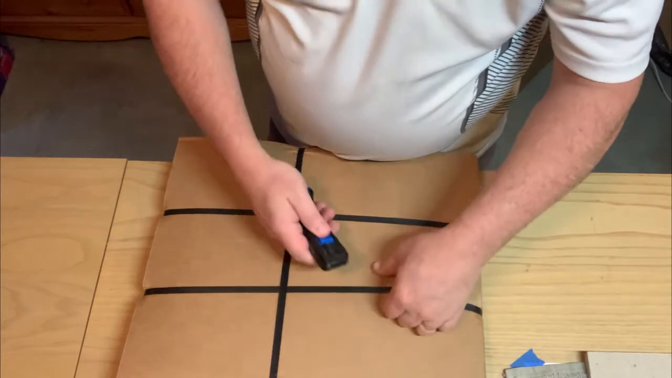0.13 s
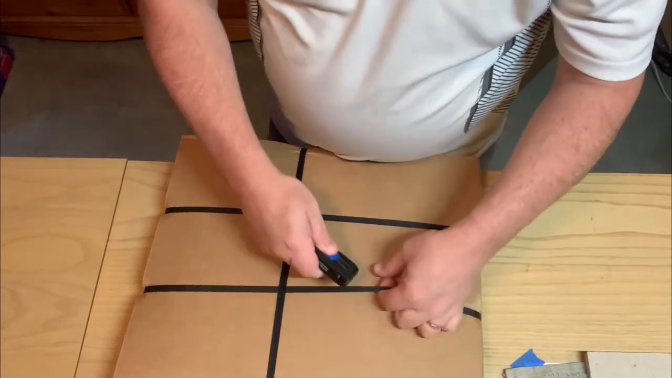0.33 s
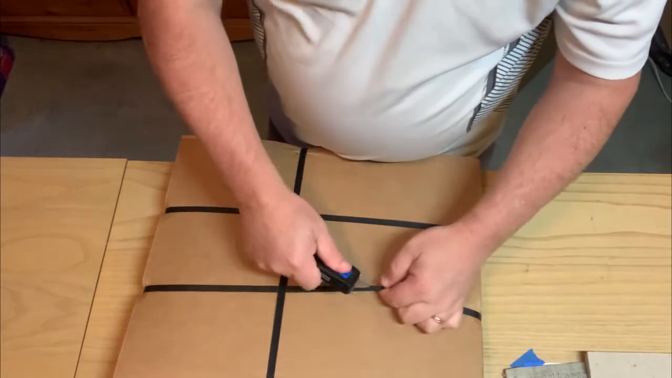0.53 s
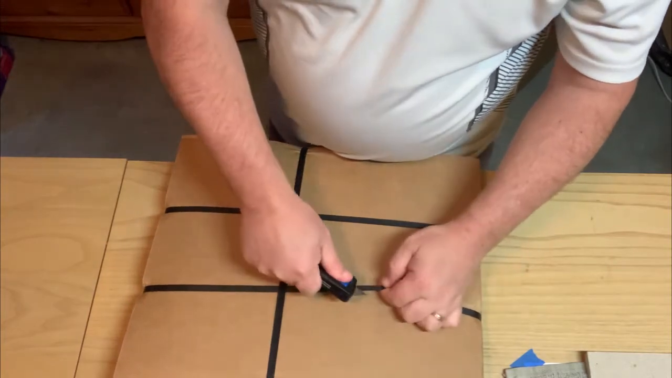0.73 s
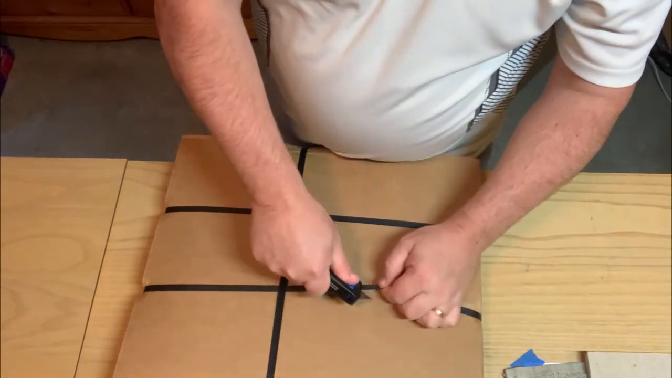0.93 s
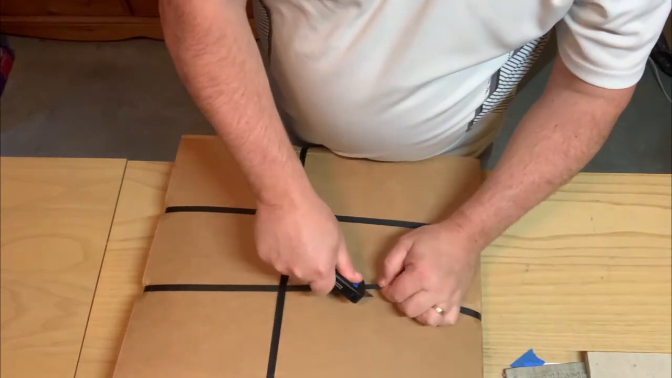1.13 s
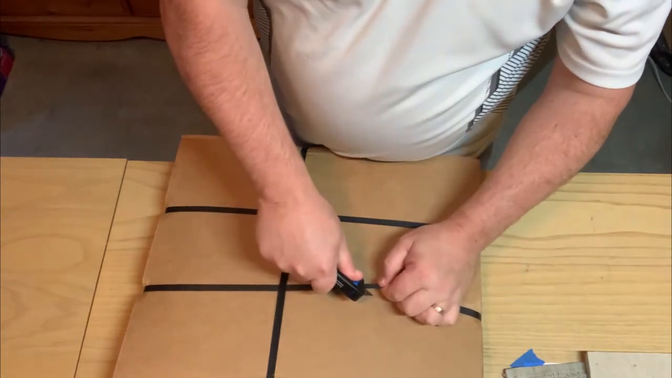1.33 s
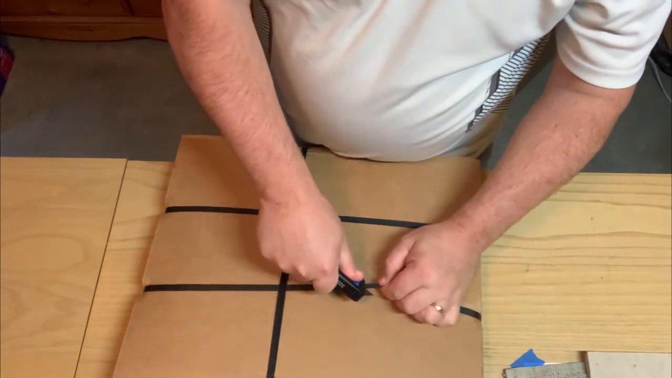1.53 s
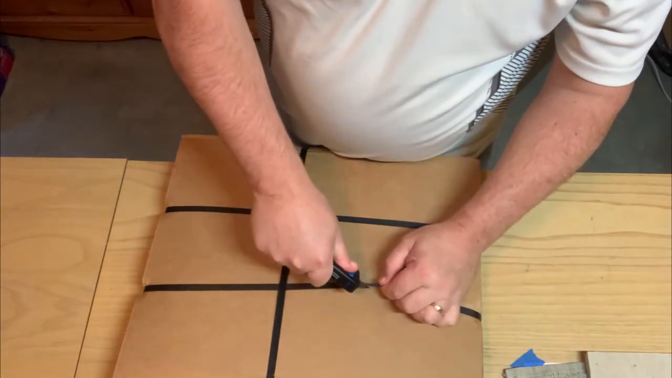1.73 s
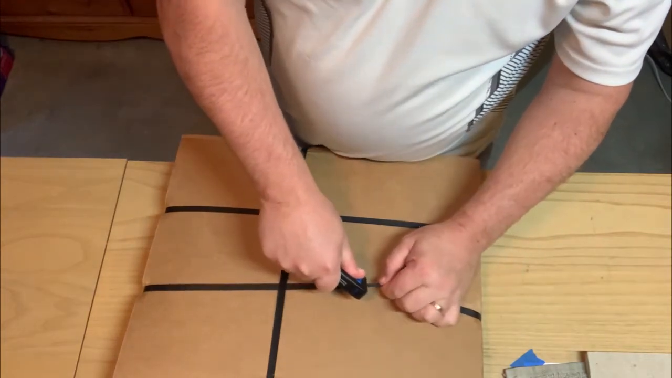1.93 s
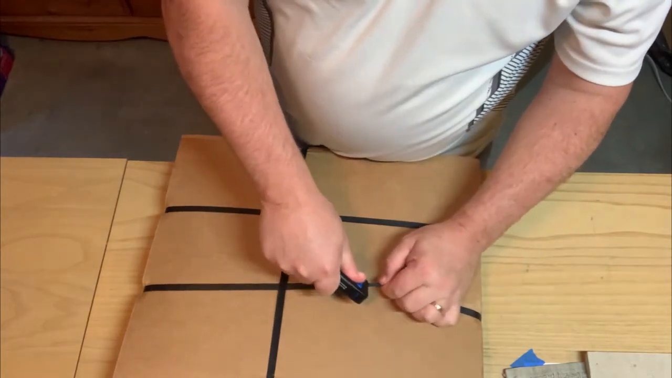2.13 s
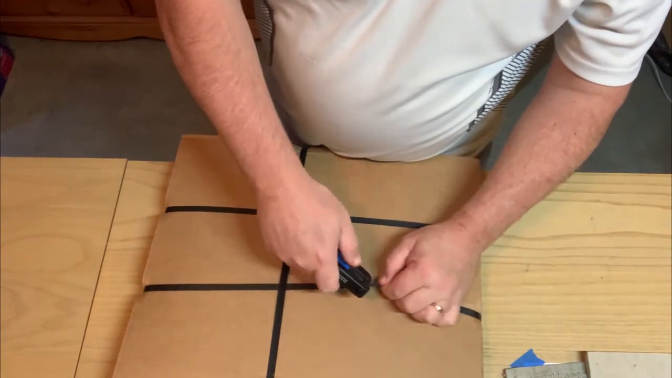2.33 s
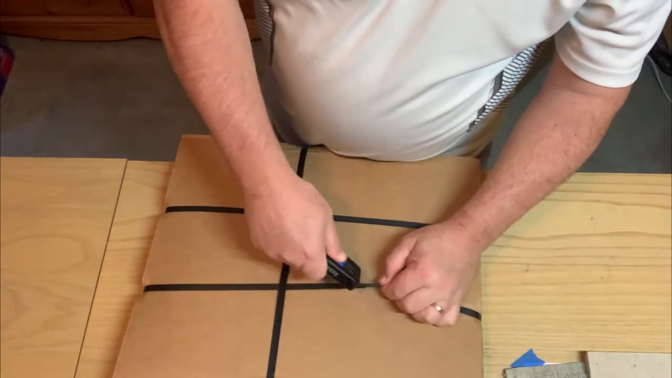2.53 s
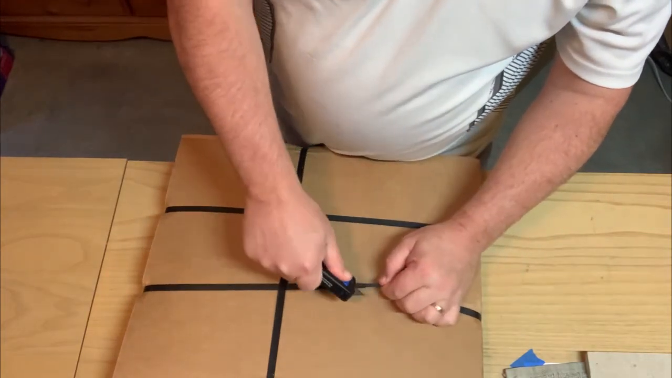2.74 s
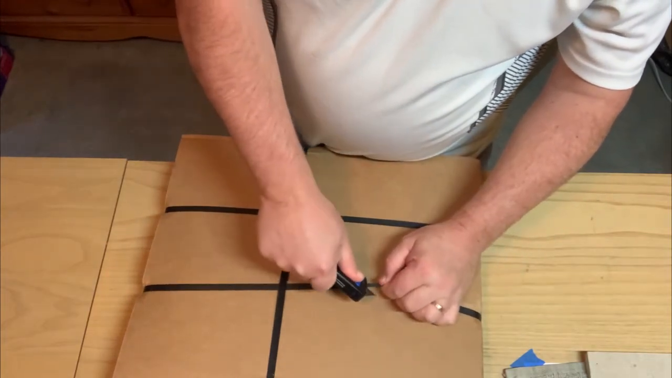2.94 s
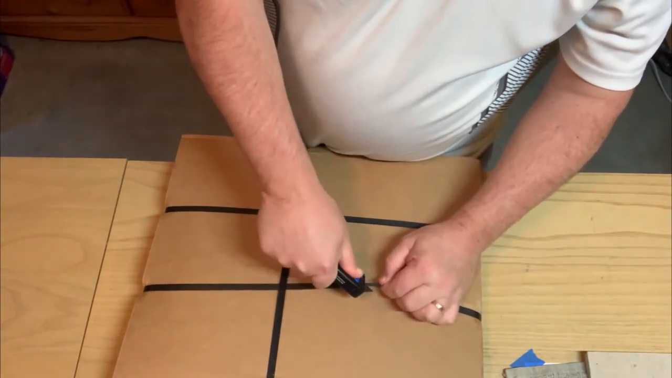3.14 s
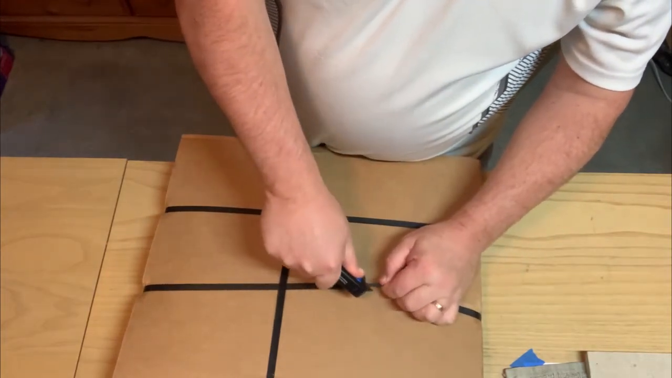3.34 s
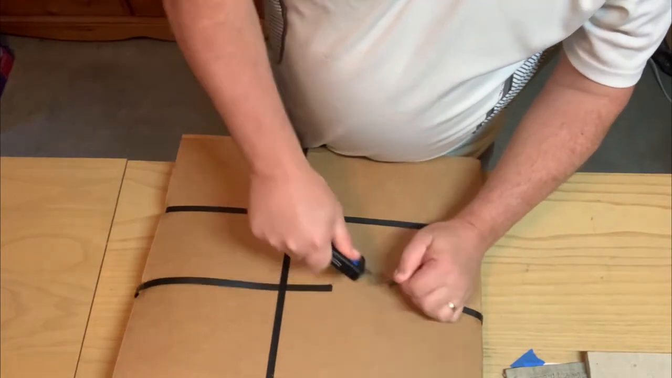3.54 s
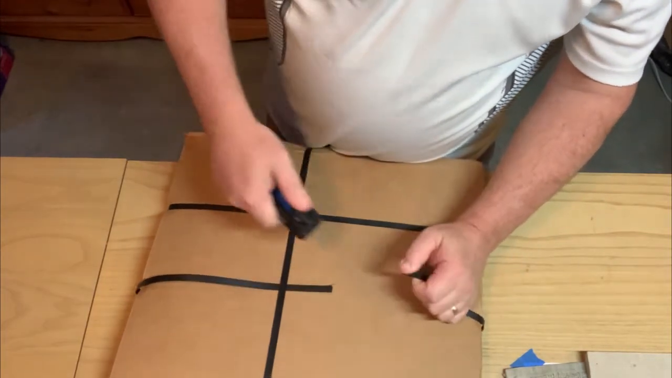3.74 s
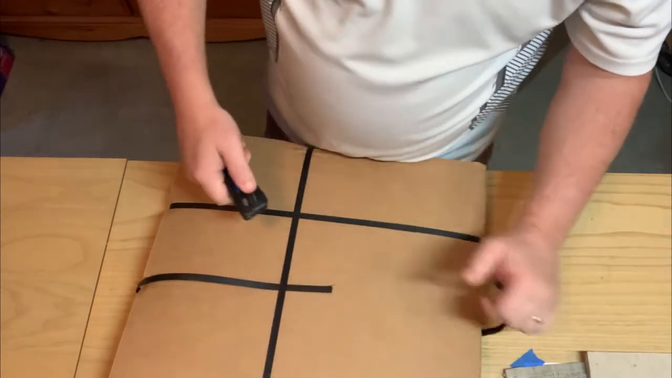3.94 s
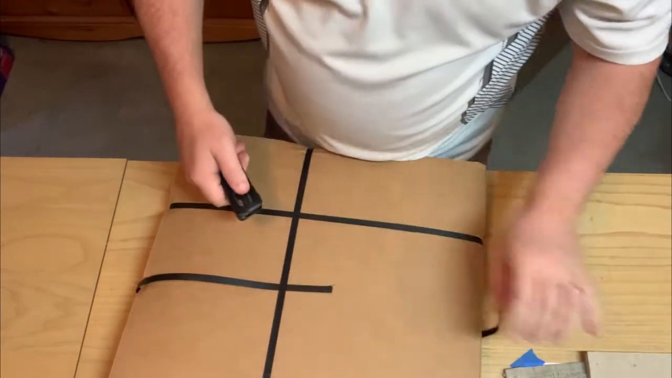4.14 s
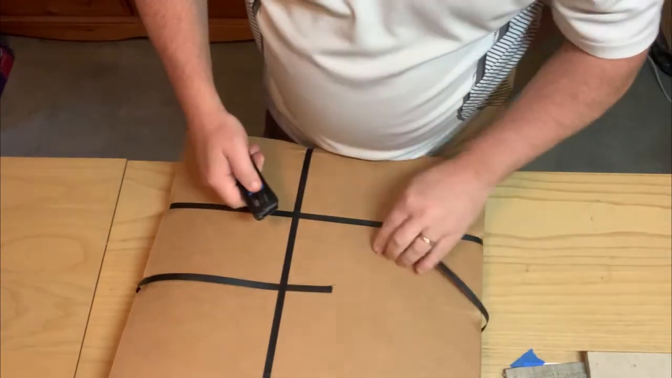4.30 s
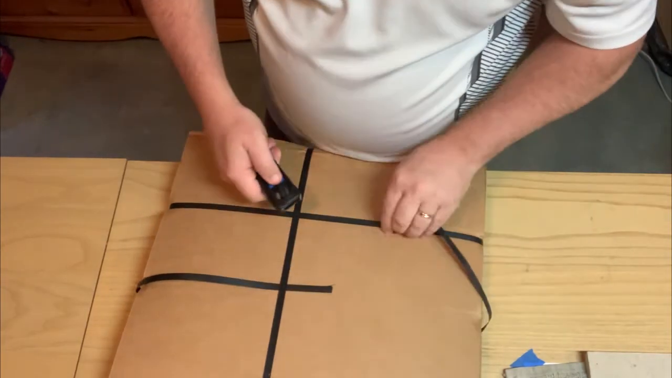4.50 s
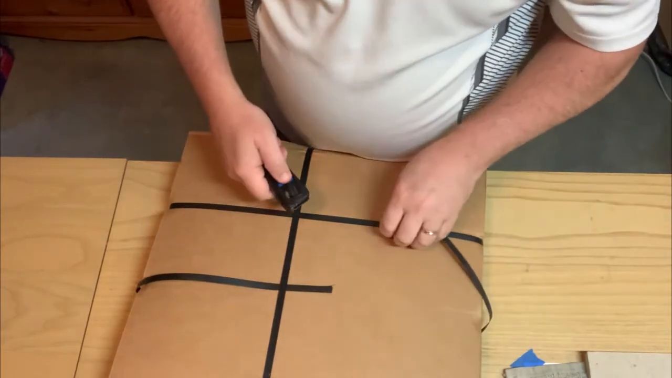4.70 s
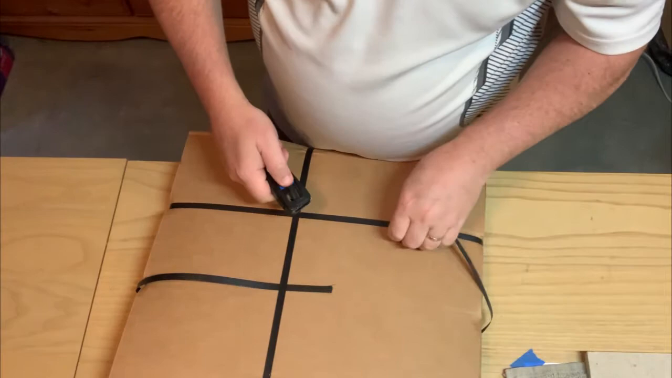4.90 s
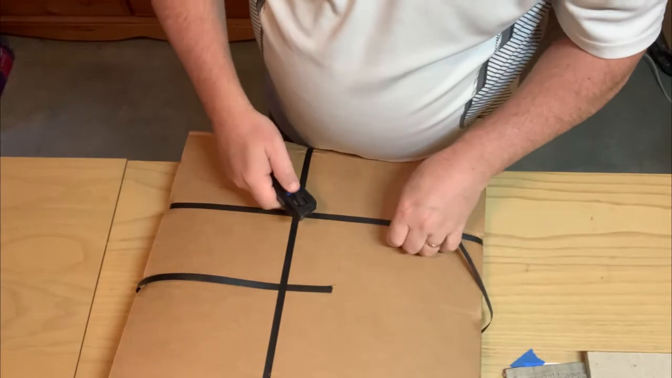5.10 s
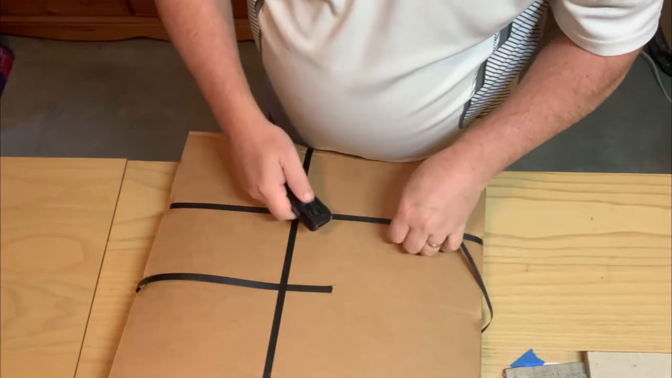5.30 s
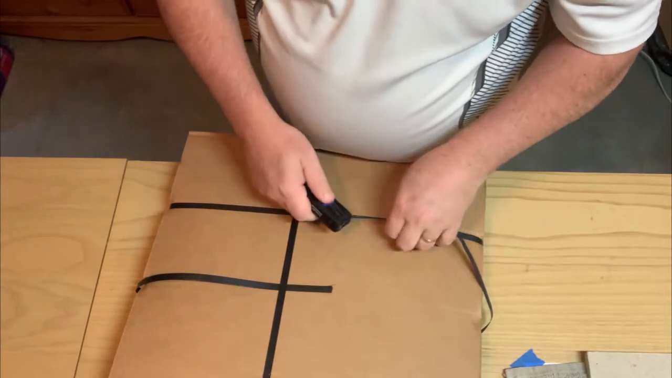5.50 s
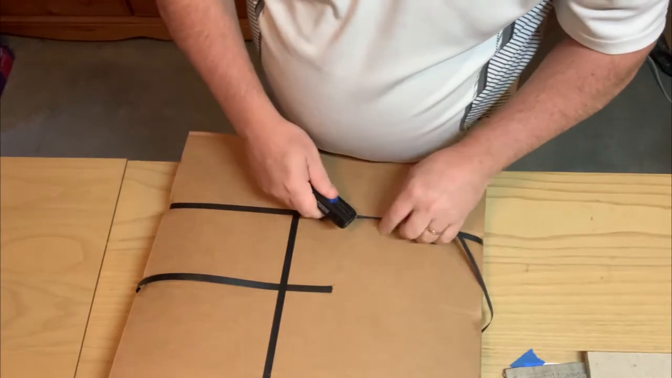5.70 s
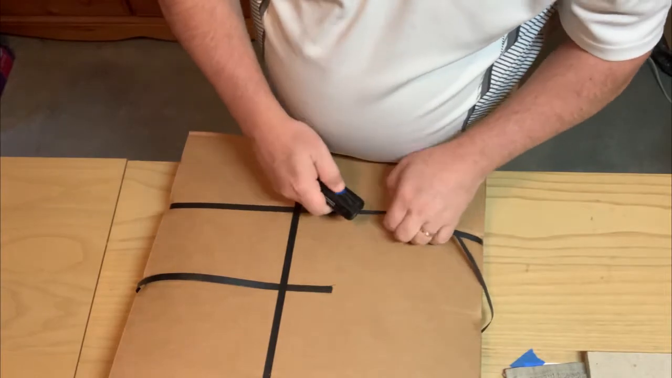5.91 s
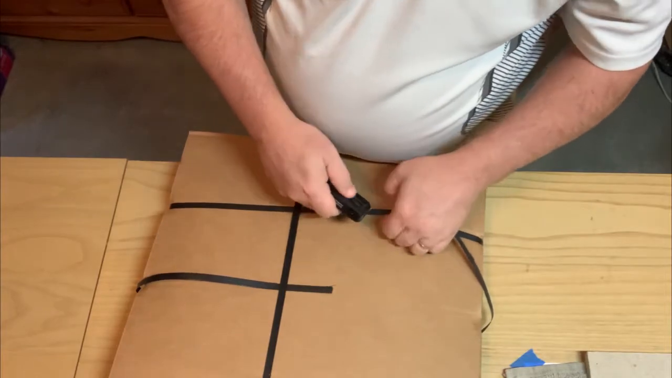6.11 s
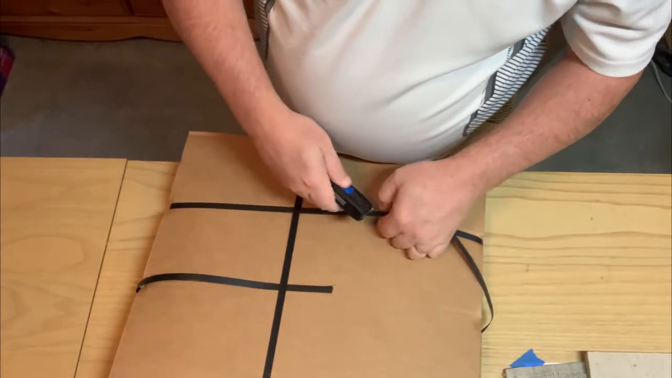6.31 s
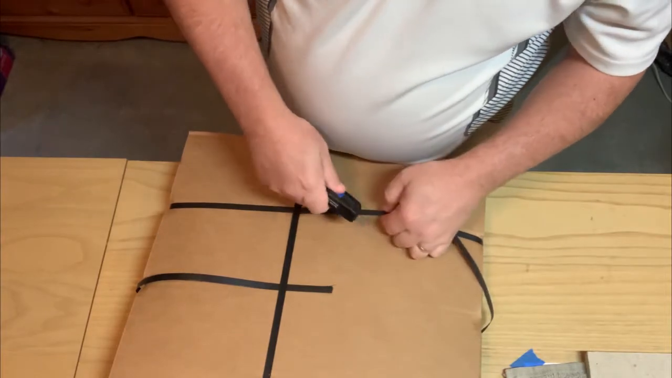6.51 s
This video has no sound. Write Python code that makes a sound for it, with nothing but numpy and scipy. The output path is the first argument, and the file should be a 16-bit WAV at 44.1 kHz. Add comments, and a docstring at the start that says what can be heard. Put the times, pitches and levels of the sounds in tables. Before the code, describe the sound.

A utility knife scrapes and clicks at a taut plastic strap on a cardboard package, then the strap bursts with loud cracks and a boxy thump.

```python
"""Sawing through a plastic strap on a cardboard box

A utility knife saws through a taut strap on a flat cardboard package in a hard-walled room. Bursts of noise,
shaped by resonances, make the clicks of the knife, the cracks of the strap and the taps on cardboard.
Blows make the box boom with fading sine waves; rubbing and sliding hands are grainy noise.
A motor hums faintly behind, made of gliding, wavering sine tones that swell and fade, over rumble and hiss.
"""
import sys
import numpy as np
from scipy import signal
from scipy.fft import rfft, irfft
from scipy.io import wavfile

SR = 44100
rng = np.random.default_rng(int(sys.argv[2]) if len(sys.argv) > 2 else 0)


def transcribe(u):
    """Save the signal u as a 16-bit wav file named by the first command-line argument.

    u: samples, shape (n,) or (channels, n), limited to [-1, 1]; the rate is SR.
    q: integer samples, one column per channel.
    """
    v = np.clip(np.atleast_2d(u).T, -1, 1)
    q = np.round(v * 32767).astype(np.int16)
    wavfile.write(sys.argv[1], SR, q)


N = 288980
TIME = np.arange(N) / SR

# usual resonances of each part, before small detuning: (f/Hz, width/Hz, relative level/dB)
STRAP_MODES = [(7000, 1200, -1.5), (8200, 1000, -3.5), (10100, 700, 4), (10360, 1000, -7.5),
               (12390, 2600, -1.5), (14700, 840, -8)]
KNIFE_MODES = [(2180, 400, -5.5), (2900, 510, -10), (3726, 600, -3.5), (4230, 750, -4), (4700, 200, -1.5),
               (5440, 600, -7.5), (5800, 700, -3.5), (6950, 1300, -6)]
CARDBOARD_MODES = [(970, 100, 5), (1190, 130, 9), (1380, 130, 5), (1650, 240, 3), (1920, 330, -0.5),
                   (2240, 90, -6)]
# knife, knuckles or the strap's end land on the cardboard:
# (t/s, tap level/dB, plastic crack level/dB, pitch of the spot f/Hz)
TAP_HITS = [(0.154, -52, -56, 1582), (0.3795, -54.5, -66, 2060), (0.4986, -48.5, -54, 1190),
            (0.559, -49.5, -65, 1190), (1.2216, -55.5, -81, 1650), (1.652, -48.5, -65, 1657),
            (1.73, -54, -61, 1285), (1.749, -42, -70, 1580), (1.786, -43, -59, 1910),
            (2.389, -37, -49, 1140), (2.6339, -48.5, -43, 1223), (3.125, -45.5, -53, 1590),
            (3.1552, -37, -41.5, 1650), (3.166, -47.5, -47, 1300), (3.4198, -22, -20.5, 1300),
            (3.7269, -37, -46, 1400), (4.785, -50, -64, 1640), (4.9428, -42, -45.5, 1400),
            (5.4162, -34.5, -61, 1720), (5.6418, -43.5, -58, 1680), (5.7634, -50.5, -54, 1354),
            (5.847, -43, -34, 1480), (5.858, -41.5, -52.5, 1283)]
KNIFE_HZ, BOARD_HZ = 4140, 1260   # pitches of the usual spots


def from_db(db):
    """Turn decibels into a factor for the wave's height."""
    return 10 ** (np.asarray(db) / 20)


def rms_one(x):
    """Scale a sound so that its average strength (rms) is 1."""
    return x / np.sqrt(np.mean(x ** 2) + 1e-20)


def level_over(x, span_s):
    """Scale a blow so that its energy equals rms 1 held for span_s."""
    return x * np.sqrt(span_s * SR / (np.sum(x ** 2) + 1e-20))


def in_time(rows):
    """Join the points of a table by straight lines over time, one curve per column."""
    s, *columns = np.transpose(rows)
    return [np.interp(TIME, s, c) for c in columns]


def at_hz(points, hz):
    """Read a table at any frequency, with straight lines on a musical (log) pitch scale."""
    known_hz, values = np.transpose(points)
    return np.interp(np.log(np.maximum(hz, 1)), np.log(known_hz), values)


def add(track, s, sound):
    """Mix a sound into a track from time s on."""
    start = round(s * SR)
    track[start:start + len(sound)] += sound[:N - start]


def bins(x):
    """Frequencies in Hz of the steps in the spectrum of x."""
    return np.fft.rfftfreq(x.shape[-1], 1 / SR)


def colour(x, spectrum):
    """Give a steady sound a spectrum and rms 1."""
    return rms_one(irfft(rfft(x) * from_db(at_hz(spectrum, bins(x))), N))


def drift(per_s):
    """Slow random wandering of rms 1, with per_s new values a second."""
    knots = rng.standard_normal(400)
    return rms_one(np.interp(TIME * per_s, np.arange(len(knots)), knots, period=len(knots)))


def diffuse(size):
    """Stereo white noise arriving from all sides: left and right are alike at some pitches only."""
    # (f/Hz, left-right likeness from 0 to 1)
    likeness = [(50, 0.96), (130, 0.93), (250, 0.3), (500, 0), (2500, 0.069), (6500, 0), (8500, 1),
                (11000, 0.9), (14000, 1)]
    mid, side = rng.standard_normal((2, size))
    alike = np.clip(at_hz(likeness, bins(mid)), -1, 1)
    shared = np.sqrt((1 + alike) / 2) * rfft(mid)
    opposed = np.sqrt((1 - alike) / 2) * rfft(side)
    return irfft(shared + opposed * [[1], [-1]], size)


def resonate(x, resonances, bass_cut_hz=800):
    """Ring a part: clusters of close modes add their powers, and small parts radiate little bass."""
    size, f = len(x), np.maximum(bins(x), 1)
    power = sum(from_db(db) ** 2 / (1 + ((f * f - hz * hz) / (f * width)) ** 2) for hz, width, db in resonances)
    radiated = power / (1 + (bass_cut_hz / f) ** 2) ** 2
    # folding the cepstrum (minimum phase) makes the ring follow the push, not precede it
    cepstrum = irfft(np.log(radiated + 1e-9), size)
    cepstrum[0] /= 2
    return irfft(rfft(x) * np.exp(rfft(cepstrum[:size // 2], size)), size)


def struck_at(part, spot_hz):
    """Detune each resonance a little and raise those near the pitch of the struck spot."""
    scatter = 0.017   # typical share by which grip and pressure shift a resonance from blow to blow
    spot_db, spot_octaves = 8.5, 0.22   # how strongly and how widely the spot is favoured
    struck = []
    for hz, width, db in part:
        near = np.exp(-(np.log2(hz / spot_hz) / spot_octaves) ** 2)
        struck.append((hz * (1 + scatter * rng.standard_normal()), width, db + spot_db * near))
    return struck


def noise_burst(burst_s, decay_db=-17, decay_s=0.014, lead_db=-21, rise_s=0.009, size=2048, count=2):
    """A short noise burst with a faint random lead-in and a crackling decay; also the time before the burst."""
    lead_s = size / 4 / SR
    age = TIME[:size] - lead_s
    gate = (age >= 0) * np.exp(-(age / burst_s) ** 4)
    burst = rng.standard_normal(size) * gate
    for _ in range(count):   # even out the strength over all pitches, then cut to length again
        burst = irfft(np.exp(1j * np.angle(rfft(burst))), size) * gate
    lead_in = rng.standard_normal(size) * (age < 0) * np.exp(-np.abs(age) / rise_s)
    to_silence = 1 - np.arange(size) / size
    decay = rng.laplace(size=size) * (age >= 0) * np.exp(-np.abs(age) / decay_s) * to_silence
    force = rms_one(burst) + from_db(lead_db) * rms_one(lead_in) + from_db(decay_db) * rms_one(decay)
    return np.pad(force, (0, size)), lead_s   # the silence leaves room for the ring


def strike(hits, part, burst_s):
    """Noise bursts, given as (t/s, level/dB, pitch of the spot f/Hz), ring one part."""
    out = np.zeros(N)
    for s, db, hz in hits:
        force, lead_s = noise_burst(burst_s)
        ring = resonate(force, struck_at(part, hz))
        add(out, s - lead_s, from_db(db) * level_over(ring, span_s=0.0031))
    return out


def motor_hum(waver_db=3.0, hum_db=-3.5):
    """A motor's turning sounds as a gliding tone with faint, wavering tones at multiples of its pitch."""
    # before and after the strap parts: (t/s, f/Hz)
    hum_pitch = [
        [(0.0, 103.3), (0.13, 104.5), (3.3, 103.2)],
        [(4.0, 104.4), (5.0, 105.4), (6.4, 106.9)],
    ]
    # swells and fades before and after the strap parts: (t/s, relative level/dB)
    hum_swell = [
        [(0.0, -45), (0.89, -47.5), (1.48, -56), (1.57, -85), (1.74, -48.5), (1.87, -70.5), (2.18, -50),
         (3.35, -56)],
        [(3.8, -58), (3.99, -49.5), (5.72, -51), (5.87, -61.5), (6.06, -55.5), (6.43, -62), (6.45, -69),
         (6.5, -58.5)],
    ]
    # tones of the hum: (multiple of the pitch, relative level/dB)
    orders = [(1, 4.5), (1.5, -30), (2, -31.5), (2.5, -27.5), (3, -28)]
    hz, = in_time(np.vstack(hum_pitch))
    level_db, = in_time(np.vstack(hum_swell))
    turn = 2 * np.pi * np.cumsum(hz) / SR
    hum = 0
    for k, db in orders:
        waver = waver_db * drift(8.8) * (k != 1)   # the main tone has no waver of its own
        hum = hum + from_db(db + waver) * np.sin(k * turn + rng.uniform(0, 2 * np.pi))
    return from_db(level_db + hum_db) * hum


def motor_drone(drone_hz=54.0, drone_db=-2.5, waver_db=4.5):
    """A deep sine tone that wavers in level and slightly in pitch."""
    # (t/s, relative level/dB)
    drone_swell = [(0, -54), (0.35, -52), (0.62, -69), (1.5, -64.5), (1.8, -46.5), (2.1, -61), (4.4, -52),
                   (5.3, -55), (6.2, -52.5), (6.55, -53)]
    level_db = in_time(drone_swell)[0] + drone_db + waver_db * drift(7.3)
    return from_db(level_db) * np.sin(2 * np.pi * drone_hz * TIME + 0.81 * drift(5.3))


def motor_whine(whine_hz=428):
    """A faint, higher sine tone that joins the hum late."""
    # (t/s, relative level/dB)
    whine_swell = [(5.6, -105), (5.8, -83), (6, -74.5), (6.55, -80)]
    return from_db(in_time(whine_swell)[0]) * np.sin(2 * np.pi * whine_hz * TIME)


def background(pan_db=1.5, rumble_db=-56, air_db=-78.0):
    """The motor's tones over low rumble, both stronger on the right, and a trace of hiss from all sides."""
    # colours of the low rumble and of the hiss: (f/Hz, relative level per Hz/dB)
    rumble_colour = [(20, -7.5), (35, -9.5), (55, -4.5), (80, 0), (140, -6), (250, -14), (400, -26.5),
                     (700, -39), (1500, -55)]
    air_colour = [(400, -2), (1000, 2), (2000, -5.5), (3000, -3), (5700, -8), (6200, 5.5), (6800, -8.5),
                  (9000, -3.5), (14000, -10.5), (16000, -15.5)]
    motor = np.sqrt(2) * (motor_hum() + motor_drone() + motor_whine())
    rumble = from_db(rumble_db + drift(2.9)) * colour(diffuse(N), rumble_colour)
    air = from_db(air_db) * colour(diffuse(N), air_colour)
    return (motor + rumble) * from_db(pan_db * np.array([[-1], [1]])) + air


def room(x, first_wall_s=0.0008, build_s=0.00028):
    """Echoes blur into a dense tail that builds after the first wall echo and dies soonest in the treble."""
    # time to fade by 60 dB: (f/Hz, t/s)
    fade_times = [(100, 0.75), (400, 0.51), (1200, 0.76), (2500, 0.65), (4500, 0.62), (8000, 0.52),
                  (14000, 0.38)]
    # echoes compared with the direct sound: (f/Hz, level/dB)
    echo_levels = [(60, -0.5), (200, -10), (600, 2), (1200, -2.5), (2500, 1.5), (4500, 1), (6500, -2.5),
                   (10000, -14.5), (13000, -6.5), (15000, -9.5), (17000, -24.5)]
    t, noise, tail = TIME[:SR], diffuse(SR), 0
    centres = np.geomspace(40, 18000, 20)   # Hz
    age, spectrum = np.maximum(t - first_wall_s, 0), rfft(noise)
    for k, hz in enumerate(centres):
        band_share = np.interp(bins(noise), centres, np.arange(len(centres)) == k)
        band = irfft(spectrum * band_share, SR)
        fade = (1 - np.exp(-age / build_s)) * from_db(-60 * age / at_hz(fade_times, hz))
        tail = tail + band * fade / np.linalg.norm(fade) * from_db(at_hz(echo_levels, hz))
    return signal.fftconvolve(x[None], tail, axes=1)[:, :N]


def friction(per_s, spread_db, smooth_share, uneven_db):
    """Fibres catch and let go: clumped grains of uneven size over a smooth hiss."""
    sizes = from_db(spread_db * np.minimum(rng.exponential(1, N), 5)) * rng.choice([-1, 1], N)
    grains = rms_one(sizes * (rng.random(N) < per_s / SR))
    return (grains + smooth_share * rng.standard_normal(N)) * from_db(uneven_db * drift(55))


def stroke_gains():
    """Each stroke speeds up, holds and slows down; hiss and scrape both follow its speed."""
    # over the package: (start t/s, length t/s, relative level of skin hissing on cardboard/dB,
    # relative level of blade and strap scraping/dB)
    strokes = [(-.07, 0.42, -57, -59), (0.34, 0.29, -60.5, -64), (1.193, 0.085, -95, -70),
               (1.632, 0.082, -67, -60), (1.718, 0.051, -44.5, -49.5), (1.827, .03, -47, -51),
               (2.23, 0.24, -61, -64), (2.552, 0.17, -57.5, -59.5), (3.035, 0.099, -57.5, -55.5),
               (3.37, 0.072, -37.5, -33), (3.432, .27, -65.5, -48), (3.916, 0.22, -62, -68.5),
               (4.333, 0.27, -48.5, -58.5), (4.708, 0.049, -53, -59.5), (4.746, 0.16, -53.5, -59.5),
               (4.929, 0.041, -60.5, -58), (5.247, 0.16, -61.5, -66), (5.632, 0.07, -49.5, -55.5),
               (5.749, 0.068, -47, -59.5), (5.845, 0.13, -53, -54), (6.089, 0.14, -60, -79.5),
               (6.178, 0.513, -74.5, -71.5)]
    rise, fall = 0.26, .36   # shares of a stroke spent speeding up and slowing down
    hiss = scrape = 0
    for s, length_s, hiss_db, scrape_db in strokes:
        done = (TIME - s) / length_s
        ramp = np.clip(np.minimum(done / rise, (1 - done) / fall), 0, 1)
        speed = np.sin(np.pi / 2 * ramp) ** 2
        hiss = hiss + from_db(hiss_db) * speed
        scrape = scrape + from_db(scrape_db) * speed
    return hiss, scrape


def rubbing():
    """Skin hisses over the cardboard; blade and strap scrape it more coarsely, and their catches ring it."""
    # colours of the two kinds of rubbing: (f/Hz, relative level per Hz/dB)
    hiss_colour = [(300, -11.5), (1500, -14), (5000, -12.5), (7500, 2.5), (9500, 2), (12500, 4.5),
                   (14500, -2), (16000, -10.5)]
    scrape_colour = [(200, -1), (500, -2.5), (680, 0), (860, -5.5), (1350, -5), (1550, -2), (1820, -2.5),
                     (2700, -7), (3600, -1), (5300, -4.5), (7000, -1.5), (14000, -26)]
    hiss_gain, scrape_gain = stroke_gains()
    hiss = colour(friction(per_s=1500, spread_db=1.5, smooth_share=0.75, uneven_db=2.0), hiss_colour)
    scrape = colour(friction(per_s=420, spread_db=3.0, smooth_share=0.3, uneven_db=2.5), scrape_colour)
    catching = friction(per_s=190, spread_db=-2.0, smooth_share=0.18, uneven_db=3.0)
    catches = rms_one(resonate(catching, CARDBOARD_MODES))
    return hiss_gain * hiss + scrape_gain * (from_db(-2.0) * scrape + from_db(-7.5) * catches)


def squeaks(width_hz=160):
    """Blade and strap stick and slip: swelling noise keeps one narrow resonance sounding unevenly."""
    # (start t/s, length t/s, f/Hz, level before the swell/dB)
    squeak_list = [(0, 0.13, 3550, -63.5), (0, 0.21, 1380, -64), (0.41, 0.14, 1930, -63),
                   (0.702, 0.037, 2220, -67.5), (3.95, 0.27, 1738, -62.5), (5.276, 0.073, 1710, -65.5)]
    out = np.zeros(N)
    for s, length_s, hz, db in squeak_list:
        swell = np.sqrt(np.hanning(round(length_s * SR)))
        mode = [(hz, 2 * width_hz, 0)]
        tone = resonate(resonate(rng.standard_normal(len(swell)), mode), mode)   # twice narrows it
        add(out, s, from_db(db) * rms_one(tone) * swell)
    return out


def ticks(knife_db=-12):
    """Cardboard pressed by the blade gives way in small dull ticks that faintly ring the knife."""
    # (t/s, level/dB, pitch of the spot f/Hz)
    tick_hits = [(0.354, -56.5, 1380), (0.416, -61, 1950), (0.434, -58, 1800), (0.455, -53, 1920),
                 (0.473, -56, 1800), (0.511, -51.5, 1930), (0.542, -54, 1940), (0.596, -60, 1200),
                 (0.709, -66, 2270), (1.113, -69.5, 1190), (1.172, -71, 1270), (1.236, -59.5, 1250),
                 (1.511, -67.5, 1190), (1.551, -58, 2240), (2.77, -53.5, 1170), (2.838, -67, 1140),
                 (2.965, -56.5, 1400), (2.977, -56, 1190), (3.885, -45, 1350), (6.278, -62.5, 1780),
                 (6.316, -65, 1810)]
    board = strike(tick_hits, CARDBOARD_MODES, burst_s=0.0035)
    ring = strike([(s, db + knife_db, KNIFE_HZ) for s, db, _ in tick_hits], KNIFE_MODES, burst_s=0.0039)
    return board + ring


def taps(strap_hz=10000, knife_db=-10.5):
    """A tap sounds the cardboard at the pitch of its spot, with a plastic crack and a little knife ring."""
    board = strike([(s, db, hz) for s, db, _, hz in TAP_HITS], CARDBOARD_MODES, burst_s=0.0021)
    crack = strike([(s, db, strap_hz) for s, _, db, _ in TAP_HITS], STRAP_MODES, burst_s=0.0022)
    ring = strike([(s, db + knife_db, KNIFE_HZ) for s, db, _, _ in TAP_HITS], KNIFE_MODES, burst_s=0.002)
    return board + crack + ring


def bending_wave(contact_s, size, travel_s=0.0042, top_hz=2500):
    """A blow's first wave runs across the lid, treble first and bass last: a short falling chirp."""
    # colour of the wave: (f/Hz, relative level per Hz/dB)
    bending = [(25, -13), (60, -4), (150, 2), (300, 0.5), (450, -2.5), (600, -4), (800, -1.5), (1000, -5.5),
               (1300, -1), (1600, -7), (2100, -4), (3000, -21.5), (4500, -49.5)]
    hz = np.fft.rfftfreq(size, 1 / SR)
    phase = 2 * np.pi * travel_s * (2 * np.sqrt(top_hz * hz) - hz)   # delays low pitches more
    strength = from_db(at_hz(bending, hz)) / (1 + (hz * contact_s) ** 2)
    wave = irfft(strength * np.exp(-1j * phase), size)
    return rms_one(wave * (np.arange(size) < size // 2))


def box(travel_s=0.00297, scatter_db=-2.5, detune=0.014, wave_db=-2.0):
    """Blows and taps send a bending wave over the lid and ring the box; bass comes later, so booms fall in pitch."""
    # blows that shake the whole package: (t/s, level/dB, contact time t/s)
    thumps = [(1.763, -44, 0.0094), (3.182, -45, 0.019), (3.4197, -18.5, .0001), (3.4235, -20.5, 0.0028),
              (3.432, -31, .0015), (3.447, -34.5, 0.003), (3.459, -36, 0.0035), (3.512, -43.5, 0.03),
              (3.592, -42, .03), (3.604, -43.5, 0.0008), (4.112, -52, .0006), (4.35, -44.5, 0.026),
              (4.41, -43.5, 0.043), (4.571, -55, 0.0015), (4.785, -50.5, 0.0011), (4.838, -58, 0.0014),
              (4.944, -49.5, 0.0035), (5.417, -57, 0.00012)]
    # panels and air of the package, before small random changes:
    # (f/Hz, relative level/dB, time to fade by 60 dB t/s, left minus right level/dB)
    box_modes = [(27.2, -28, 0.95, -6.5), (42.4, -26.5, 0.88, 2), (56, -13.5, 0.22, -2.5),
                 (81.2, -13.5, 0.082, -2.5), (116.8, -10, 0.27, -11), (151.7, 0, 0.19, -9),
                 (200.5, -6, 0.099, -7), (266.3, -1, 0.025, -5.5), (302, 5.5, 0.028, -6.5),
                 (389, -1, 0.023, -3), (433, -1.5, 0.085, -3), (532, -3, 0.059, -3), (680, 4, 0.027, 5.5),
                 (794, 8, 0.037, 2), (980, -2, 0.011, -2), (1292, 7.5, 0.02, -2.5),
                 (1738, -5.5, 0.021, -4.5), (2015, 3.5, 0.03, -4.5), (2450, 2, 0.0069, -3)]
    shake_db, tap_contact_s = -19.5, 0.00043   # a tap shakes the package, relative to the tap
    out, t = np.zeros((2, N)), TIME[:SR // 2]
    shakes = [(s, db + shake_db, tap_contact_s) for s, db, _, _ in TAP_HITS]
    for s, blow_db, contact_s in list(thumps) + shakes:
        boom = 0
        for hz, db, t60, pan_db in box_modes:
            age = np.maximum(t - travel_s * (np.sqrt(box_modes[-1][0] / hz) - 1), 0)
            swell = 1 - np.exp(-2 * age * hz)   # a panel takes part of a cycle to get going
            soft = 1 / (1 + (hz * contact_s) ** 2)   # a long, soft push reaches only the low modes
            wave = np.sin(2 * np.pi * hz * (1 + detune * rng.standard_normal()) * age)
            mode = soft * swell * wave * from_db(db + scatter_db * rng.standard_normal() - 60 * age / t60)
            boom = boom + mode * from_db(pan_db * np.array([[1], [-1]]) / 2)
        boom = rms_one(boom) + from_db(wave_db) * bending_wave(contact_s, size=len(t))
        for side, sound in zip(out, level_over(boom, span_s=0.059)):
            add(side, s, from_db(blow_db) * sound)
    return out


def snaps(strap_hz=10800, board_db=-18):
    """The strap cracks under blade or hand; each crack rings the knife and the cardboard beneath."""
    # (t/s, plastic crack level/dB, knife ring level/dB, pitch of the spot on the knife f/Hz)
    snap_hits = [(0.382, -63, -48, 4100), (0.562, -58, -48.5, 4200), (0.638, -71, -58, 5400),
                 (1.644, -47.5, -49.5, 4350), (1.687, -45.5, -48.5, 3900), (1.73, -39, -50, 5140),
                 (1.782, -28, -40.5, 4330), (1.8455, -27.5, -29, 4870), (1.8573, -10.5, -19, 4500),
                 (2.13, -55.5, -65.5, 4565), (2.389, -20.5, -20.5, 4320), (2.564, -46, -51.5, 4080),
                 (2.779, -54.5, -57.5, 4460), (3.0466, -30.5, -31.5, 2240), (3.3005, -51.5, -45.5, 4750),
                 (3.3657, -49, -46, 5170), (3.3749, -24, -29, 5600), (3.3815, -29.5, -33, 5500),
                 (3.3855, -18.5, -21.5, 5800), (3.3905, -12.5, -22, 5590), (3.397, -27.5, -30, 5200),
                 (3.402, -27.5, -31.5, 5200), (3.4155, -27.5, -31.5, 4800), (3.419, -19, -20, 4540),
                 (3.4235, -15, -30.5, 4750), (3.7097, -22.5, -27.5, 3950), (3.718, -37.5, -32, 3800),
                 (3.7233, -30.5, -21.5, 4296), (3.7264, -12, -19, 4500), (4.1053, -37.5, -46.5, 3870),
                 (4.114, -43, -44, 4700), (4.3558, -40.5, -77, 5500), (4.7111, -47.5, -68, 4600),
                 (5.4163, -25.5, -31.5, 4300), (5.6406, -36, -60, 5270), (6.277, -56, -63, 4290),
                 (6.469, -63, -58.5, 5500), (6.534, -54, -46.5, 3950)]
    crack = strike([(s, db, strap_hz) for s, db, _, _ in snap_hits], STRAP_MODES, burst_s=0.0031)
    ring = strike([(s, db, hz) for s, _, db, hz in snap_hits], KNIFE_MODES, burst_s=0.003)
    board = strike([(s, db + board_db, BOARD_HZ) for s, db, _, _ in snap_hits], CARDBOARD_MODES, burst_s=0.0059)
    return crack + ring + board


def scene():
    """The work on the package, its reverberation and the background."""
    work = rubbing() + squeaks() + ticks() + taps() + box() + snaps()
    return background() + room(work.mean(axis=0)) + work


def record(dry):
    """The microphone colours the treble, its two ports shift the phase, peaks clip and the top is cut."""
    # the two ports: (f/Hz, phase by which left leads/radians)
    ports = [(100, 0.5), (600, 1.23), (1500, 0.4), (4000, -2), (5500, -2), (6500, -6), (8000, -2.5),
             (9300, -3), (10400, -2.5), (11500, -1.4), (13200, -0.7), (16000, 2.5)]
    # the microphone's colour: (f/Hz, level/dB)
    mic = [(7400, 0), (8200, -1), (8900, 0.5), (16000, -2)]
    cutoff_hz = 16100
    shift = np.exp(1j * at_hz(ports, bins(dry)) * np.array([[1], [-1]]) / 2)
    coloured = irfft(rfft(dry) * shift * from_db(at_hz(mic, bins(dry))), N)
    heard = np.clip(coloured, -.85, .85)
    return signal.sosfilt(signal.butter(24, cutoff_hz, fs=SR, output="sos"), heard)


dry = scene()
out = record(dry)
transcribe(out)
```